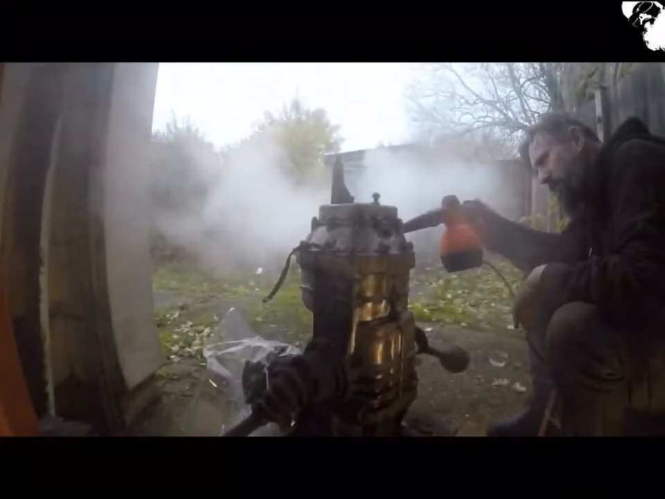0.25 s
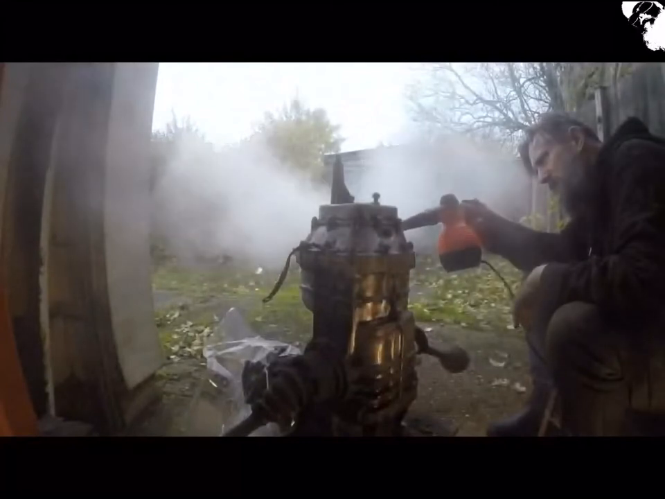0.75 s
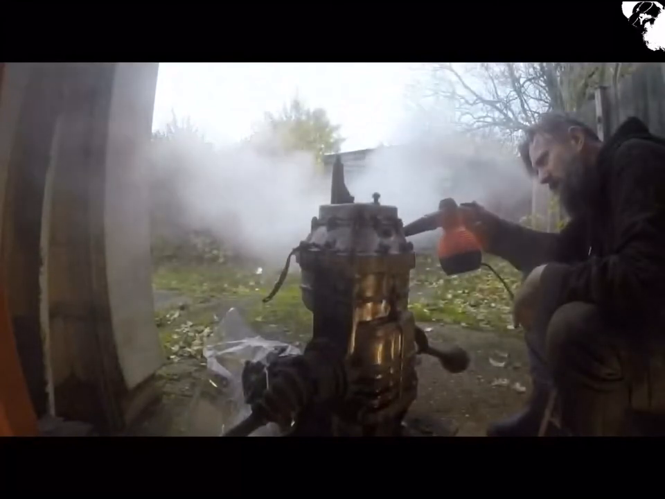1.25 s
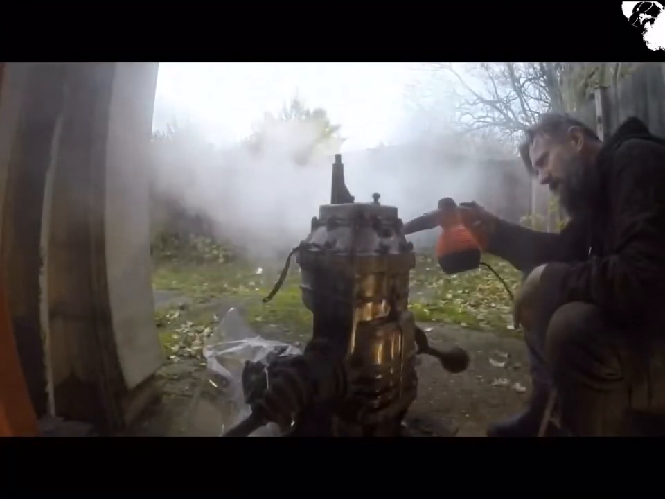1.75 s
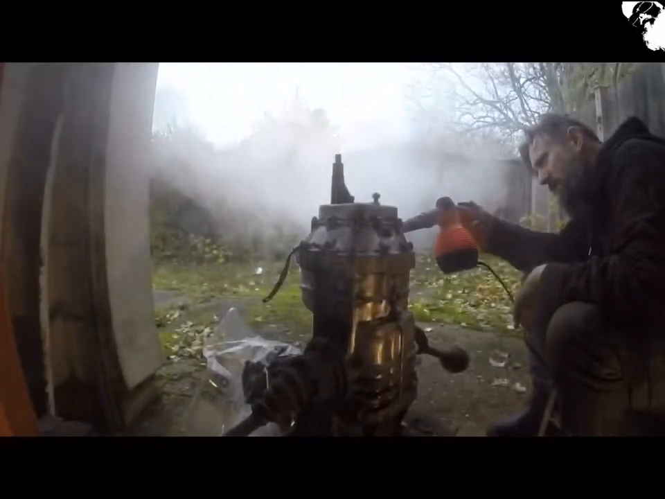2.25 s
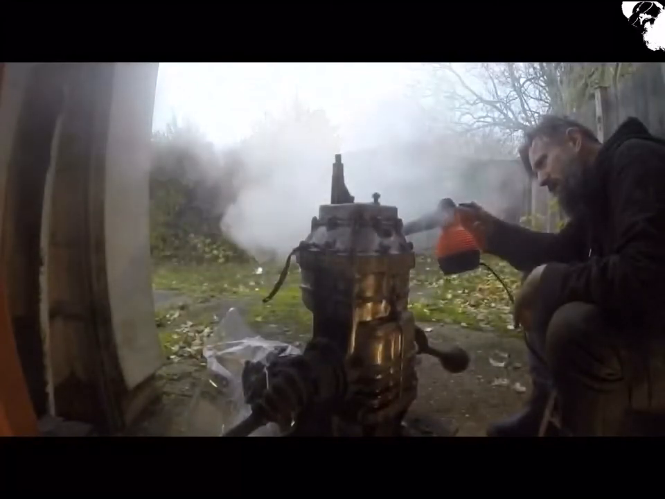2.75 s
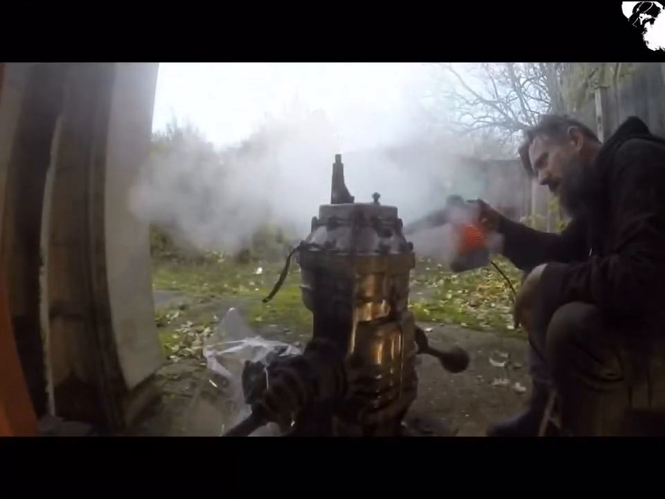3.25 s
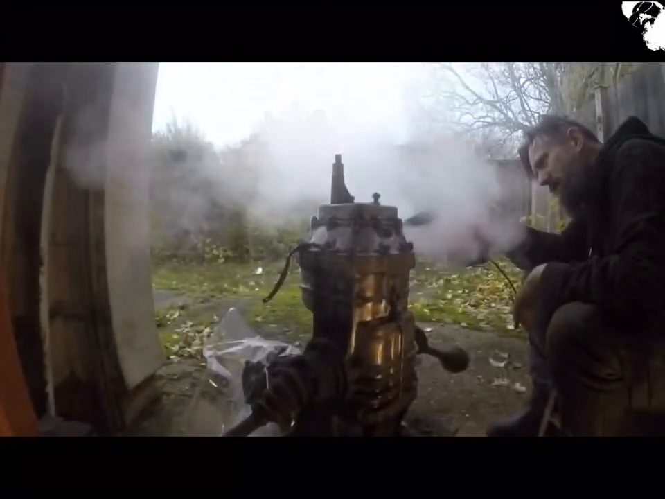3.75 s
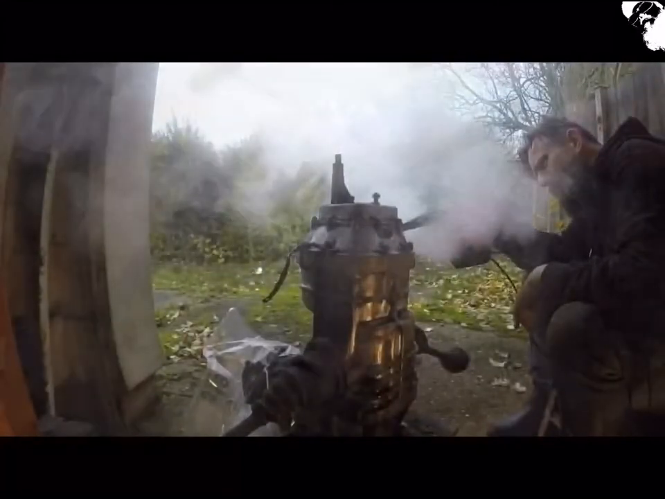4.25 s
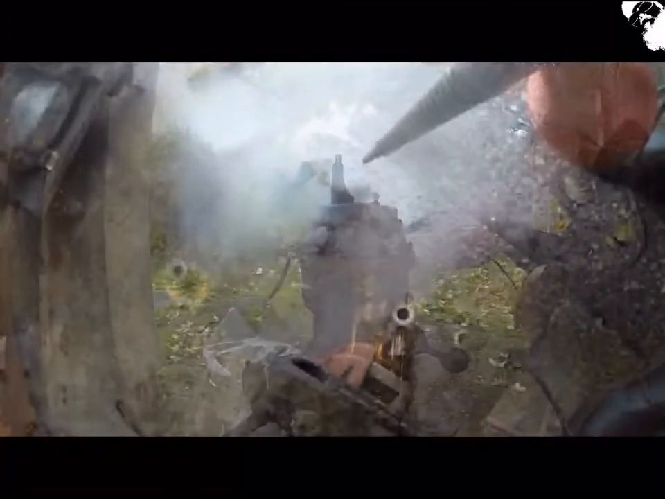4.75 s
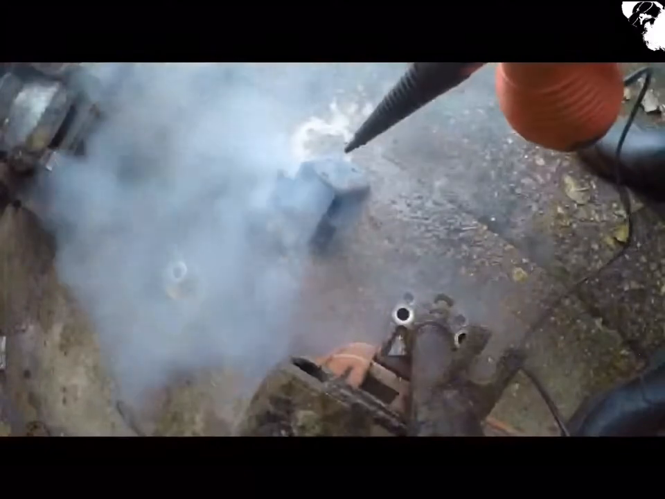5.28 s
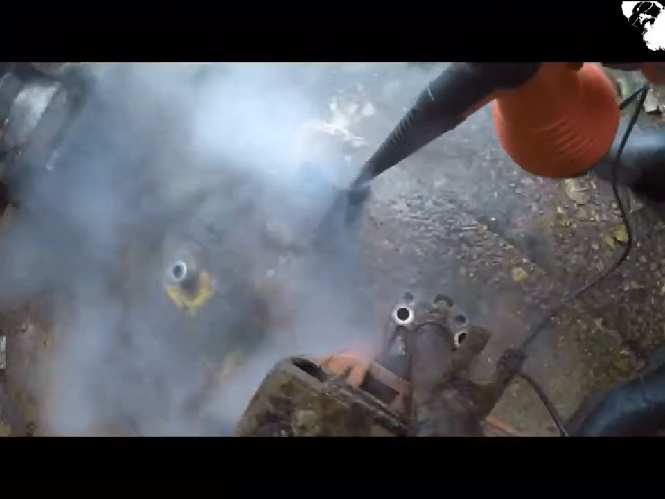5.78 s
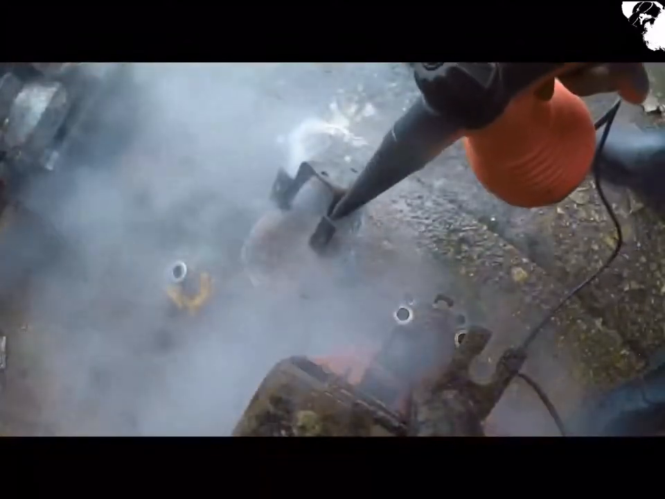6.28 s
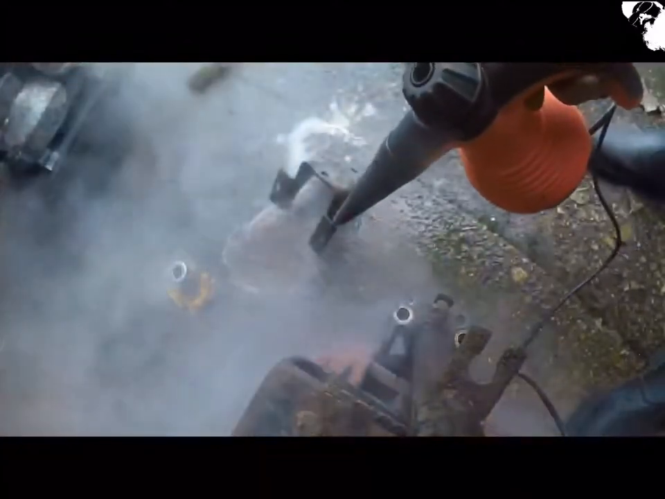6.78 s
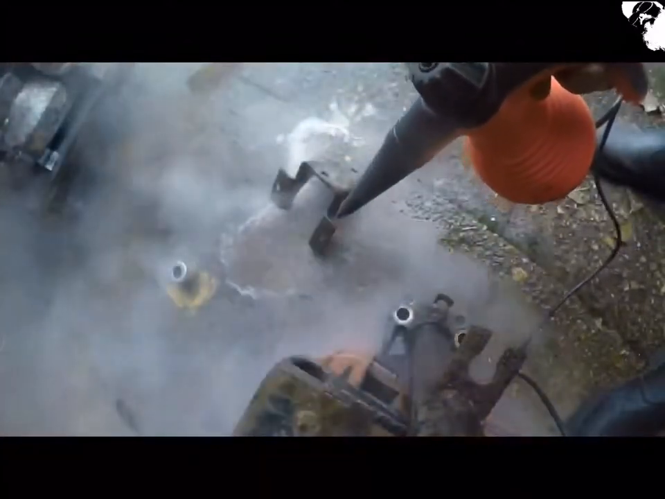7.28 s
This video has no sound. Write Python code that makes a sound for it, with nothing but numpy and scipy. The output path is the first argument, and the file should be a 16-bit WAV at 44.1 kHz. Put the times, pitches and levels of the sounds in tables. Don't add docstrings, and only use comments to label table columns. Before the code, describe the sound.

A steady but fluttering jet of steam, mid-distance and boxy, opens with a wet gurgle and keeps spitting drops. Around 4.5 seconds a quick crossfade moves the microphone close: rough gushing over open ground, then from about 5.8 seconds a more intense, hollow, resonant blast in metal with shrill airy edges. Outdoors, dry, mono, coloured by the camera case, with low road rumble far off.

```python
import sys
import numpy as np
from scipy import signal
from scipy.fft import rfft, irfft, next_fast_len
from scipy.io import wavfile

SR = 44100
rng = np.random.default_rng(int(sys.argv[2]) if len(sys.argv) > 2 else 0)


def generate_wav(signal):
    frames = np.transpose(np.atleast_2d(signal))
    scaled = np.clip(frames, -1, 1) * 32767
    pcm = np.round(scaled).astype(np.int16)
    wavfile.write(sys.argv[1], SR, pcm)


def field_ratio(decibels):
    return 10 ** (np.asarray(decibels, dtype=float) / 20)


N = 331632
T = np.arange(N) / SR
SIZE = next_fast_len(N)
HZ = np.maximum(np.arange(SIZE // 2 + 1) * SR / SIZE, 1)

# f/Hz, level/dB per Hz
FAR_HISS = [(150, -60), (250, -37.5), (419, -21.5), (991, -20.5), (1840, -7), (2010, -5.5), (2300, -9.5),
            (3420, -3), (3790, -3.5), (5000, -9.5), (11400, -12), (15300, -19)]
# f/Hz, level/dB per Hz
NEAR_HISS = [(150, -57), (250, -39), (1010, -24.5), (1500, -12.5), (2040, -25.5), (2980, 1), (3930, -4),
             (6360, -5.5), (7690, -4.5), (8230, -3.5), (15300, -3)]
# f/Hz, level/dB per Hz
BRACKET_HOWL = [(710, -75), (1200, -47), (1990, -11), (2220, -6), (2580, 0.5), (2810, 4), (4000, -6.5),
                (7500, -15), (9750, -46), (16500, -120)]
FAR_CASE_PITCH = [1060, 1655, 1800, 2030, 2290, 2600, 2760, 3130, 3440, 3740, 4000, 4650, 5000, 5800, 6500,
                  7050, 7350, 7900, 9950, 10300]
# width/Hz, level/dB
FAR_CASE_SHAPE = [(73.6, 6.5), (70, 3), (70, 2.5), (160, -8), (162, 7), (85, -1.5), (80.4, 9), (200, 8),
                  (129, -7), (161, 8), (100, 1.5), (138.89, 6), (200, -2.5), (111.11, 4.5), (185.19, 2),
                  (200, -0.5), (120, -0.5), (111.11, 2.5), (200, 1), (200, -4.5)]
NEAR_CASE_PITCH = [1352, 1781, 2040, 2150, 2279, 2465, 2620, 2745, 3080, 3440, 3607, 3943, 4337, 4516, 4830,
                   5061, 5391, 5780, 6600, 6930, 7750, 10400, 11700, 12600, 15000]
# width/Hz, level/dB
NEAR_CASE_SHAPE = [(60, 3.5), (71, 6.5), (100, 0), (88, 6), (65, 6), (50.3, -3), (70.4, -9), (91, 1.5),
                   (120.37, -0.5), (101, -4.5), (50, 0), (91, 3.5), (50, -1), (60, 0.5), (100, -2.5),
                   (120, 2), (100, 2), (120, -8), (120, -3), (150, -1), (220, 1.5), (240, -2.5),
                   (185.19, 0), (500, 0), (500, 1.5)]
# t/s, extra level/dB, length/s
WATER_SLUGS = [(0.096, 3.5, 0.02), (1.25, 2, 0.045), (1.376, 4, 0.013), (1.689, 5.5, 0.0054),
               (1.718, 4.5, 0.0046), (1.732, 3, 0.0051), (2.318, 2, 0.036), (2.737, 6, 0.0052),
               (2.998, 1, .02), (3.875, 2, 0.014), (4.343, 5, 0.012), (6.131, 1, 0.0037),
               (6.164, -1, 0.028), (6.365, 2, 0.006)]
# close take starts t/s, is fully in t/s, far take is gone t/s
DISSOLVE = (4.4, 4.49, 4.75)
SWING_PITCH = (800, 1850, 3300, 11000)
# t/s, level/dB over the mean
STEAM_PRESSURE = [(0, -4.5), (.35, -1), (.65, -1), (.9, -2), (1.4, -1), (2.1, -1), (2.5, 0), (2.85, 0.5),
                  (3.05, 0), (3.25, -1), (3.55, 1), (4.1, -.5), (4.75, 2.5)]
# middle t/s, half length/s, level/dB
WATER_IN_JET = [(0.13, 0.12, 3.5), (1.0, .05, 2.5), (1.715, .055, 3), (2.32, 0.05, 0.5), (2.76, .04, 1),
                (3.26, 0.029, 4), (4.345, 0.062, 2), (2.92, .05, 0), (4.58, .13, 5.5), (4.05, 0.21, -0.5)]
WATER_SHARES = (1.7, 1.12, 0.98, -0.36)
# middle t/s, half length/s, hiss level/dB
HISS_SWINGS = [(.01, .03, 7.5), (.33, 0.16, 2), (.56, 0.045, 0), (.72, 0.039, -2), (1.6, 0.049, 1),
               (1.9, 0.083, 2), (2.27, 0.031, -3), (2.43, 0.069, 4), (2.8, 0.085, -2.5), (3.0, 0.1, 2),
               (3.45, 0.12, 2), (3.97, 0.045, -1.5), (4.3, 0.096, -2.5), (1.05, 0.054, 0.5),
               (1.8, .05, -2.5), (3.27, 0.033, 4), (4.06, .04, 0.5)]
HISS_SHARES = (0.0, 0.22, 0, 1.0)
# t/s, free hiss level/dB
NOZZLE_CLOSENESS = [(4.4, -55), (4.48, -35.5), (4.62, -31.5), (4.86, -31.5), (5.2, -36), (5.7, -38),
                    (5.8, -28), (6.0, -32.5), (6.19, -31), (6.26, -37), (6.56, -34), (6.75, -37.5),
                    (6.95, -33), (7.25, -34.5), (7.4, -33), (7.52, -27.5)]
# middle t/s, half length/s, level/dB
GROUND_SWEEPS = [(5.02, .25, -35.5), (5.5, 0.24, -43), (5.93, 0.096, -39.5), (6.08, 0.074, -39.5),
                 (6.6, 0.73, -45.5), (7.4, 0.23, -39.5), (4.7, 0.14, -47.5), (6.28, 0.055, -47.5)]
# middle t/s, half length/s, level/dB
BRACKET_VISITS = [(4.84, 0.33, -38.5), (5.4, 0.67, -39), (5.9, .11, -31.5), (6.08, 0.049, -37.5),
                  (6.66, 0.63, -27.5), (5.9, 0.037, -36), (6.87, 0.019, -40), (7.43, 0.12, -28),
                  (7.215, .025, -37), (7.0, 0.082, -41)]
# middle t/s, half length/s, level/dB
HIGHER_HOWLS = [
    (6.6, 0.45, -34.5),
    (6.55, 0.11, -42),
]
# middle t/s, half length/s, ridge level/dB, whistle level/dB
EDGE_GRAZES = [(4.58, 0.16, -46, -32.5), (5.5, 0.38, -65, -40), (5.81, 0.087, -30.5, -33),
               (6.14, 0.086, -24.5, -26.5), (6.36, 0.066, -35, -55), (6.55, .12, -27.5, -35.5),
               (6.92, 0.1, -28.5, -52), (7.22, 0.013, -39, -29), (7.36, .13, -25.5, -28.5),
               (6.0, 2.1, -33, -46), (4.5, 0.071, -40, -58), (6.13, 0.013, -29, -27)]
# falls t/s, low t/s, rises t/s, back t/s, level/dB
BRACKET_SLIP = (7.055, 7.095, 7.19, 7.205, -6)
# middle t/s, half length/s, f/Hz, level/dB
NOZZLE_BEAMS = [
    (6.2, 0.68, 9700, -13),
    (7.32, 0.14, 10400, -13.5),
    (6.07, 0.99, 12700, -12.5),
    (6.7, 1, 14700, -13.5),
]
# middle t/s, half length/s, level/dB
THIN_EDGE = [
    (3.68, 0.78, -52),
    (4.35, .04, -47),
]
# start t/s, end t/s, from f/Hz, to f/Hz, level/dB
NOZZLE_GURGLE = (.06, .19, 630, 1020, -55.5)
# f/Hz, level/dB per Hz
ROAD_RUMBLE = [(8.8, -12), (15, 0), (49, -0.5), (119, -9.5), (151, -12.5), (216, -11.5), (254, -18.5),
               (373, -36), (400, -23), (520, -44), (880, -120)]
# middle t/s, half length/s, level/dB
RUMBLE_SWELL = [
    (4.9, 0.46, 4),
]
# start t/s, end t/s, f/Hz, level/dB
ENGINE_DRONES = [
    (4.165, 4.56, 36.9, -53.5),
    (5.759, 5.93, 37.4, -56.5),
]


def far_jet():
    wet = np.outer(WATER_SHARES, spells(WATER_IN_JET, flat=7.2))
    hiss_swing = np.outer(HISS_SHARES, spells(HISS_SWINGS, flat=7.2))
    swing = in_time(STEAM_PRESSURE) + wet + hiss_swing

    def level_at(hz):
        shares = [np.interp(np.log(hz), np.log(SWING_PITCH), one) for one in np.eye(len(SWING_PITCH))]
        return -36.5 + shares @ swing

    noise = noise_of(at_hz(FAR_HISS, HZ) + bells(FAR_CASE_PITCH, FAR_CASE_SHAPE))
    direct = turbulence(noise, level_at, gust_db=0.5, patch_db=1.03, flutter_db=0.2)
    return reflections(direct, -13.5, spread_s=.024, wander_s=.00005, count=9)


def near_jet():
    falter = field_ratio(np.interp(T, BRACKET_SLIP[:4], [0, BRACKET_SLIP[4], BRACKET_SLIP[4], 0]))
    jet = falter * (ground_roar() + bracket_howl() + edge_ridge() + free_hiss())
    heard = rfft(jet, SIZE) * field_ratio(bells(NEAR_CASE_PITCH, NEAR_CASE_SHAPE))
    direct = turbulence(heard, lambda hz: 0, gust_db=0.5, patch_db=0.3, flutter_db=0.75)
    return reflections(direct, -13, spread_s=.02, wander_s=.00007, count=9)


def ground_roar():
    moved = np.interp(T, (5.72, 5.8), [0, 1])
    ground = coloured(1.5 * twice_resonant(1470, 540))
    under = coloured(1.5 * twice_resonant(1650, 650))
    thud = field_ratio(-14.5) * coloured(twice_resonant(780, 580))
    return visits(GROUND_SWEEPS, flat=2.6) * ((ground + thud) * (1 - moved) + under * moved)


def bracket_howl():
    howl = visits(BRACKET_VISITS, flat=3.5) * coloured(at_hz(BRACKET_HOWL, HZ))
    return howl + visits(HIGHER_HOWLS, flat=2.7) * coloured(twice_resonant(3630, 730))


def edge_ridge():
    ridge = coloured(twice_resonant(4020, 650)) + field_ratio(-4) * coloured(twice_resonant(5700, 1200))
    return ridge * field_ratio(-3.5) * visits(EDGE_GRAZES, flat=1.34)


def free_hiss():
    hiss_db, = in_time(NOZZLE_CLOSENESS)
    return field_ratio(hiss_db + 4) * (coloured(at_hz(NEAR_HISS, HZ)) + sheen())


def sheen():
    out = 0
    for s, half, hz, db in NOZZLE_BEAMS:
        passing = visits([(s, half, db)], flat=3.0) * field_ratio(2.2 * drift(1.1))
        out = out + passing * coloured(twice_resonant(hz, 650))
    return out


def edge_whistles(close):
    low = visits(THIN_EDGE, flat=2.5)
    high = field_ratio(-5) * visits(EDGE_GRAZES, flat=1.7, column=3) * close ** 2
    return whistle(low, 2360, 80) + whistle(high, 7760, 380)


def whistle(gain, hz, width):
    return coloured(twice_resonant(hz, width)) * gain


def gurgle():
    start, end, from_hz, to_hz, db = NOZZLE_GURGLE
    along = np.clip((T - start) / (end - start), 0, 1)
    pitch = (from_hz + (to_hz - from_hz) * along ** 1.7) * (1 + .09 * drift(60))
    tone = np.sin(2 * np.pi * np.cumsum(pitch) / SR)
    return np.sin(np.pi * along) ** .3 * field_ratio(db + 4 * drift(60)) * tone


def traffic():
    rumble_db = -59.5 + 1.2 * drift(3) + spells(RUMBLE_SWELL, flat=4.4)
    out = coloured(at_hz(ROAD_RUMBLE, HZ) - 60 * (HZ > 420)) * field_ratio(rumble_db)
    for start, end, hz, db in ENGINE_DRONES:
        on = np.interp(T, [start, start + 0.014, end - .03, end], [0, 1, 1, 0])
        phase = 2 * np.pi * hz * (T - start)
        out += on * field_ratio(db + 6.5) * (np.sin(phase) + 0.092 * np.sin(3 * phase))
    return out


def yard():
    return field_ratio(-65) * coloured(twice_resonant(650, 900))


def turbulence(spectrum, level_of, gust_db, patch_db, flutter_db):
    shared = gust_db * drift(16.6) + flutter_db * drift(72)
    spit = sum(db * np.exp(-.5 * ((T - s) / length) ** 2) for s, db, length in WATER_SLUGS)
    place = np.log2(HZ / 250) * 2.5
    out = 0
    for k in range(16):
        wet = np.interp(k, [0, 10, 14], [1.3, 1.0, .2])
        band = irfft(spectrum * np.clip(1 - np.abs(place - k), 0, 1), SIZE)[:N]
        level_db = level_of(250 * 2 ** (k / 2.5)) + wet * spit + shared + patch_db * drift(6)
        out = out + band * field_ratio(level_db)
    return out


def reflections(x, level_db, spread_s, wander_s, count):
    lags = .0025 + rng.random(count) ** 1.6 * spread_s
    signs = rng.choice([-1, 1], count)
    bright = signal.lfilter(*signal.butter(1, 1800, "high", fs=SR), x)
    echoes = 0
    for lag, sign in zip(lags, signs):
        echoes = echoes + sign * np.interp(T - lag - wander_s * drift(0.32), T, bright)
    out = x + field_ratio(level_db) * echoes
    return out * np.std(x) / np.std(out)


def noise_of(colour_db):
    spectrum = rfft(rng.standard_normal(SIZE)) * field_ratio(colour_db)
    return spectrum / np.std(irfft(spectrum, SIZE))


def coloured(colour_db):
    return irfft(noise_of(colour_db), SIZE)[:N]


def twice_resonant(hz, width):
    return -20 * np.log10(1 + (2 * (HZ - hz) / width) ** 2 / 2)


def bells(pitches, shapes):
    return sum(db / (1 + (2 * (HZ - hz) / width) ** 2) for hz, (width, db) in zip(pitches, shapes))


def at_hz(points, hz):
    pitches, levels = np.transpose(points)
    return np.interp(np.log(hz), np.log(pitches), levels)


def in_time(rows):
    s, *columns = np.transpose(rows)
    return np.array([np.interp(T, s, c) for c in columns])


def spells(rows, flat):
    return sum(height * np.exp(-np.abs((T - s) / half) ** flat) for s, half, height in rows)


def visits(rows, flat, column=2):
    return spells([(row[0], row[1], field_ratio(row[column])) for row in rows], flat)


def drift(rate):
    r = np.exp(-80 * np.pi * rate / SR)
    slow = signal.lfilter([1], [1, -2 * r, r * r], rng.standard_normal(N // 40 + 2002))[2000:]
    return np.interp(np.arange(N) / 40, np.arange(len(slow)), rms_one(slow))


def rms_one(x):
    return x / np.sqrt(np.mean(x ** 2) + 1e-20)


def scene():
    start, full, gone = DISSOLVE
    close = np.interp(T, [start, full], [0, 1])
    far = far_jet() * np.interp(T, [start, gone], [1, 0])
    near = near_jet() * close
    mix = far + near + edge_whistles(close) + gurgle() + traffic() + yard()
    return np.tile(mix, (2, 1))


def roll_off(x):
    return signal.sosfilt(signal.butter(12, 15520, fs=SR, output="sos"), x)


def record(dry):
    top_cut = np.clip((15280 - HZ) / 60, 0, 1)
    mono = irfft(rfft(dry[0], SIZE) * top_cut, SIZE)[:N]
    return roll_off(np.tile(mono, (2, 1)))


dry = scene()
out = record(dry)
generate_wav(out)
```